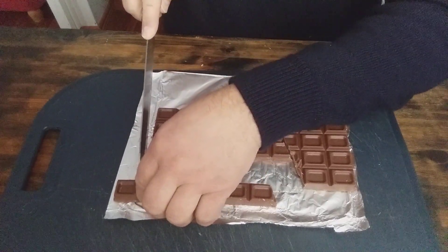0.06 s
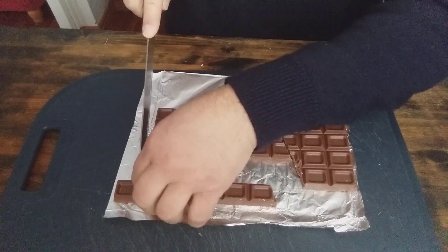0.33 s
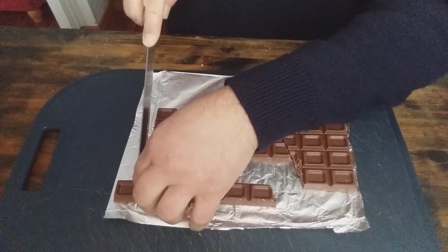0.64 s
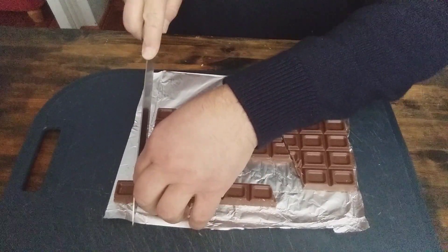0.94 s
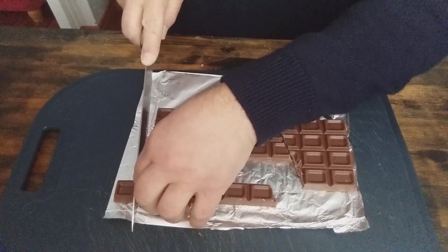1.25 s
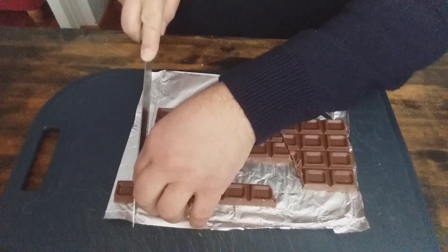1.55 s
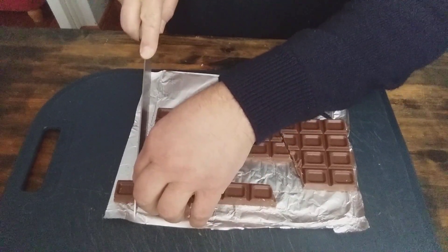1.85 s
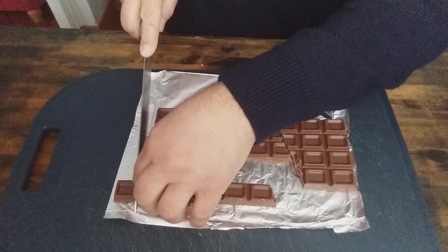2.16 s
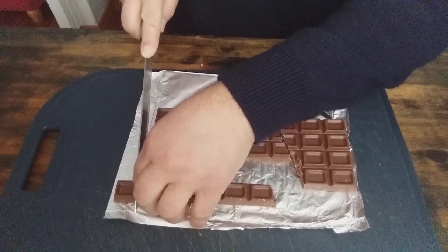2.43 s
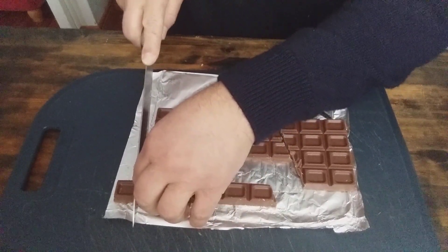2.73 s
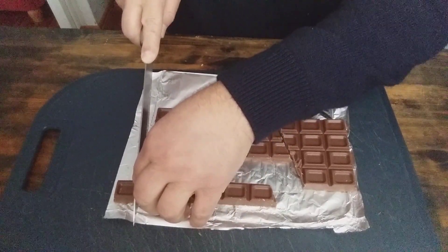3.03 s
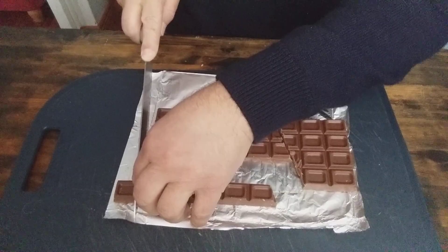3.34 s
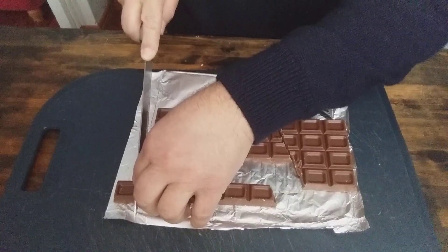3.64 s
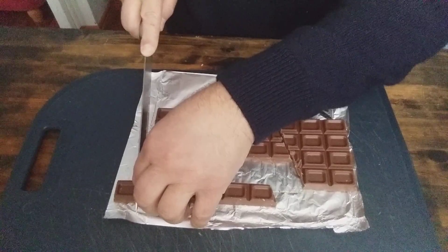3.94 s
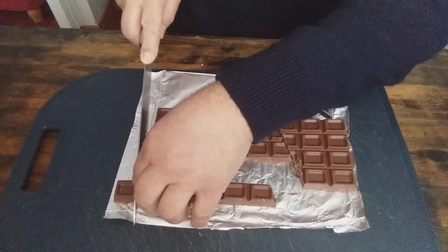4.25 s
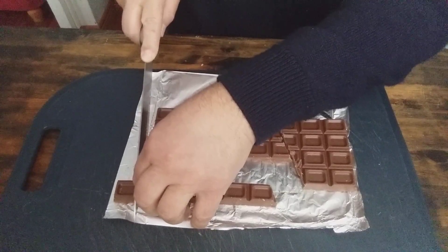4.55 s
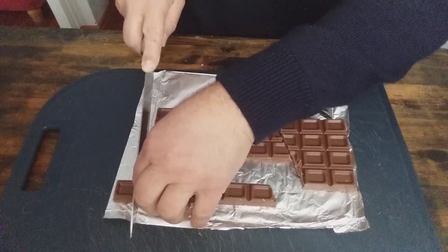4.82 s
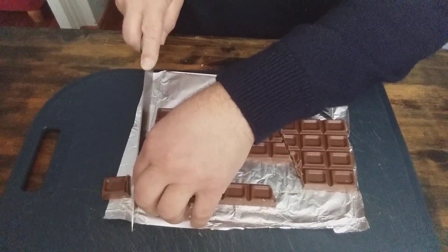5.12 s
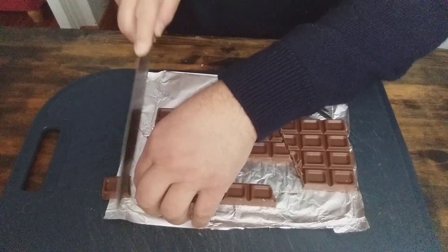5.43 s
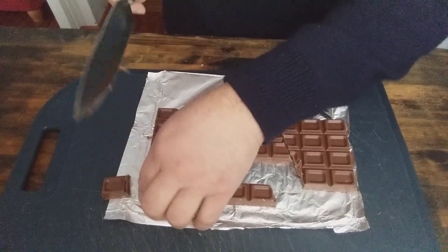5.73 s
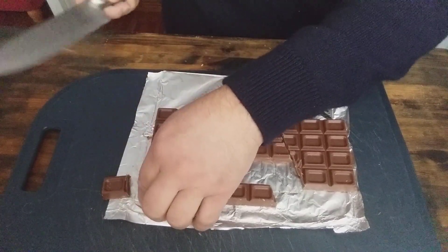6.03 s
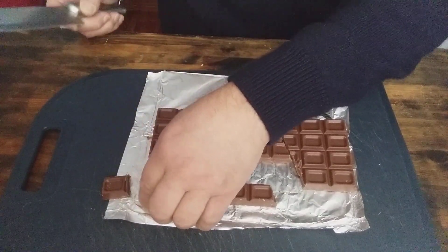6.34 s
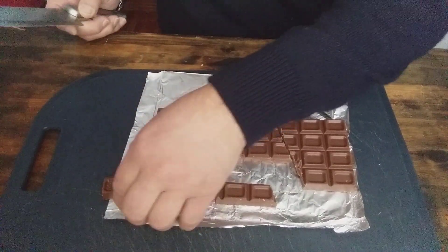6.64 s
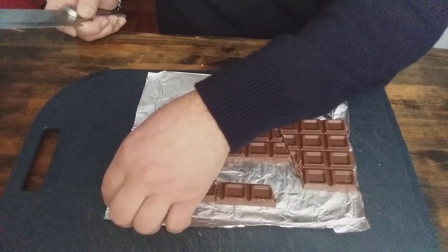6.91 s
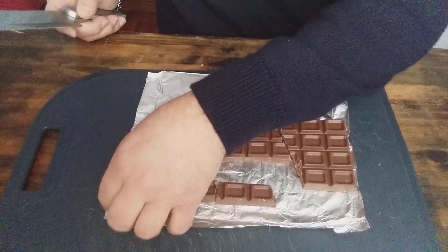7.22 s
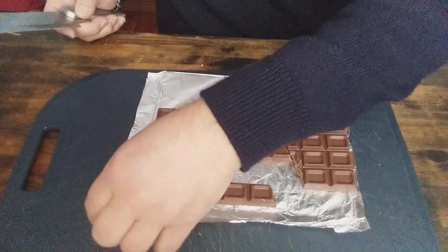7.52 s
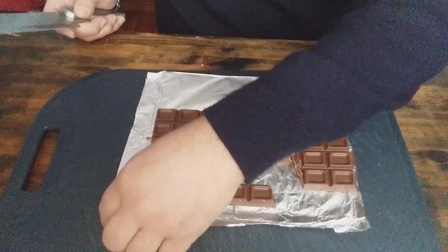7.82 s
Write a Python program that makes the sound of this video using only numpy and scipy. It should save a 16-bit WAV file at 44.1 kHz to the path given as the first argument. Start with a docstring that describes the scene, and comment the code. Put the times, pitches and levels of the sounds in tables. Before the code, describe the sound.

Thin foil crinkles with small bright ticks during the first second, close to the microphone in a small room with a faint low hum. A kitchen knife starts sawing quietly into a chocolate bar on a plastic cutting board. From about 1.5 to 4.5 seconds, uneven pushes come two or three times a second, each with a soft juddering thud, a gritty scrape and faint ringing of the steel. Between 2 and 4.2 seconds the chocolate also gives tiny creaks against the blade. At about 4.9 seconds the bar snaps and the blade slams onto the board, by far the loudest sound, with a short ring and a fine spray of splinters. A softer bump follows just after 5 seconds. From then on a hand makes scattered foil ticks and light sliding rustles, ending with a stronger brush near 7.8 seconds.

```python
"""A kitchen knife saws through a chocolate bar lying in its foil on a plastic board, close to one microphone.
Each push thuds the board, scrapes the blade into ringing and makes the chocolate creak against the steel;
then the bar snaps and the blade slams onto the board. The holding hand crinkles and brushes the foil.
The place is a small room with a short decay and a low hum."""
import sys
import numpy as np
from scipy import signal
from scipy.fft import rfft, irfft
from scipy.io import wavfile
from scipy.ndimage import uniform_filter1d

SR = 44100
rng = np.random.default_rng(int(sys.argv[2]) if len(sys.argv) > 2 else 0)


def wav_out(sig):
    """Save sig, one row per channel (or a flat mono array), as 16-bit PCM at SR to the path in sys.argv[1]."""
    wavfile.write(sys.argv[1], SR, np.round(np.clip(np.atleast_2d(sig).T, -1, 1) * 32767).astype(np.int16))


N = 347177
TIME = np.arange(N) / SR

# modes of the board on the table: pitch_hz, level_db, t60_s
BOARD_MODES = [(138, -8, .55), (185.5, -13.5, 0.63), (219.1, -12.5, 0.16), (253.5, -1, 0.17),
               (284, -3.5, .17), (442.3, -13, 0.23), (540, -9, .26), (764, 0, 0.27), (896.4, -10.5, 0.22),
               (954, -6.5, 0.23), (1080, -7, 0.14), (1153, -1.5, 0.31), (1245, -6.5, .25),
               (1380, -12.5, 0.17), (1430, -5.5, 0.37), (1610, -15, 0.19), (1687, -13.5, 0.35),
               (1987, -17.5, .23), (2042, -16, .23), (2176, -9, 0.29), (2390, -22, .23), (2593, -25, .14)]
# modes of the steel blade: pitch_hz, level_db, t60_s
BLADE_MODES = [(3207, -12, 0.37), (3486, -9, .26), (3538, -5.5, 0.23), (5226, -5, .22), (5490, -6, 0.17),
               (5470, -6.5, .2), (5643, -6, .18), (5800, -6, 0.22), (6130, -3.5, 0.23), (7400, -14, 0.24),
               (7922, -9, 0.13), (8586, -16.5, .19), (8600, -9, 0.055), (9400, -9, .09), (9600, -11, .1),
               (10840, -18, .12), (11340, -17, .1)]
# the foil's bright spectrum: frequency_hz, level_db
FOIL_SPECTRUM = [(700, -19.5), (2500, -12), (4500, -4.5), (7000, -1), (8300, -8), (10000, -0.5),
                 (13000, -2.5), (16000, -3)]
CREASE_DB, CREASE_HZ = -39.5, 6400  # a usual crease in the foil


def undb(db):
    """Decibels to gain."""
    return 10 ** (np.asarray(db) / 20)


def unit(x):
    """Scale to unit energy."""
    return x / np.sqrt(np.sum(x ** 2))


def noise(size=N):
    """White noise."""
    return rng.standard_normal(size)


def through(x, response):
    """Pass a sound through a response."""
    return signal.fftconvolve(x, response)[:N]


def lookup(points, hz):
    """Read (frequency_hz, value) points on a log-frequency axis."""
    frequencies, values = np.transpose(points)
    return np.interp(np.log(np.maximum(hz, 1)), np.log(frequencies), values)


def colour(points, size=4096):
    """Minimum-phase response of unit energy with the given spectrum."""
    magnitude = undb(lookup(points, np.fft.rfftfreq(size, 1 / SR)))
    cepstrum = irfft(np.log(magnitude))
    cepstrum[1:size // 2] *= 2
    cepstrum[size // 2 + 1:] = 0
    return unit(irfft(np.exp(rfft(cepstrum))))


def ring(modes):
    """Sum of fading modes, of unit energy; neighbours swing in opposite senses."""
    t = TIME[:SR]
    return unit(sum((-1) ** k * undb(db - 60 * t / t60) * np.sin(2 * np.pi * hz * t)
                    for k, (hz, db, t60) in enumerate(modes)))


def add(track, start_s, sound):
    """Lay a sound into a track."""
    i = max(int(start_s * SR), 0)
    part = sound[:max(N - i, 0)]
    track[i:i + len(part)] += part


def burst(rise_s, fade_s):
    """Envelope that swells and dies away, peak 1."""
    t = TIME[:SR // 4]
    shape = (1 - np.exp(-t / max(rise_s, 1 / SR))) * np.exp(-t / max(fade_s, 10 / SR))
    return shape / shape.max()


def swing(start_s, end_s):
    """Speed of a movement that starts and ends at rest, peak 1."""
    return np.abs(np.sin(np.linspace(0, np.pi, max(int((end_s - start_s) * SR), 2))))


def grit(spread_db, grain_samples=24):
    """Noise made of tiny grains of uneven size, rms 1."""
    sizes = np.repeat(undb(spread_db * noise(N // grain_samples + 1)), grain_samples)[:N]
    return unit(noise() * sizes) * np.sqrt(N)


def bending(response, lag_s, size=8192):
    """Bending waves in a plate: the treble arrives first, the bass later; lag_s is the delay at 1 kHz."""
    hz = np.maximum(np.fft.rfftfreq(size, 1 / SR), 1)
    dispersion = np.exp(-4j * np.pi * lag_s * np.sqrt(1000 * hz))
    return irfft(rfft(response, size) * dispersion, size)


def room(x, wet_db, build_s, bands=9):
    """Direct sound plus the small room's dense tail, which builds up and loses its treble first."""
    # room decay: frequency_hz, t60_s
    decay = [(100, 0.32), (300, 0.26), (1200, 0.28), (3000, .3), (7000, 0.23), (15000, 0.17)]
    t = TIME[:SR]
    centres = np.geomspace(60, 15000, bands)
    spectrum, hz = rfft(noise(SR)), np.fft.rfftfreq(SR, 1 / SR)
    tail = 0
    for centre, share in zip(centres, np.eye(bands)):
        band = irfft(spectrum * lookup(np.c_[centres, share], hz), SR)
        tail = tail + band * np.exp(-np.log(1000) * t / lookup(decay, centre))
    build_up = 1 - np.exp(-t / build_s)
    return x + undb(wet_db) * through(x, unit(tail * build_up))


def room_tone():
    """Faint air noise and a narrow, wavering low hum."""
    # the room's air: frequency_hz, level_db
    air_spectrum = [(28, -33), (50, -20), (78, -7.5), (110, -9), (135, -7), (165, -19.5), (210, -18),
                    (300, -22), (600, -29), (1000, -26.5), (2000, -33.5), (5000, -40), (8500, -44),
                    (16000, -45)]
    # course of the hum: time_s, level_db
    hum_levels = [(0, -59), (.7, -58), (1.4, -61), (5.2, -61), (5.7, -66.5), (7.87, -66)]
    times, levels = np.transpose(hum_levels)
    strength = undb(np.interp(TIME, times, levels, right=-np.inf))
    hum = strength * through(noise(), ring([(135.66, 0, 0.62)]))
    air = through(noise(), colour(air_spectrum))
    return undb(-63.5) * air + undb(2) * hum


def small_creases(count=32, gap_s=0.047, spread_db=2.5, spread_octaves=0.4):
    """Handled foil ticks faintly at uneven gaps: rows of start_s, level_db, pitch_hz."""
    # spells of handling: start_s, end_s, level_db
    handling = [(.08, .58, -47), (0.639, .76, -48), (5.28, 5.34, -52), (6.431, 6.56, -50),
                (7.3, 7.45, -45.5)]
    rows = []
    for start_s, end_s, db in handling:
        gap, size, pitch = rng.standard_normal((count, 3)).T
        times = start_s + np.cumsum(gap_s * np.exp(0.5 * gap)) - gap_s / 2
        pitches = CREASE_HZ * 2 ** (spread_octaves * (pitch - 1))
        ticks = np.c_[times, db + spread_db * size, pitches]
        rows += list(ticks[times < end_s])
    return rows


def foil():
    """Creases flip with bright ticks, each facet at its own pitch; the hand adds rustle and brushes."""
    # the loudest creases: start_s, level_db, pitch_hz
    crinkles = [(.0114, -33.5, 7000), (.038, -37, 4440), (.0632, -40, 6640), (.0741, -37, 3220),
                (.189, -41, 11100), (.2484, -34.5, 6600), (.255, -35.5, 9980), (.2974, -40, 4870),
                (.314, -41, 3500), (.3316, -22.5, 5500), (.3927, -33, 10400), (.4187, -36, 6060),
                (.4755, -40, 10600), (.532, -41.5, 9400), (.638, -31.5, 6960), (.6697, -26.5, 9200),
                (.7172, -35, 6420), (.9671, -38.5, 3800), (1.8856, -49, 3950), (4.4462, -33.5, 11000),
                (4.4802, -38, 7050), (5.1848, -34.5, 6030), (5.231, -39, 3350), (5.3954, -40.5, 5910),
                (5.5628, -40, 10070), (5.6214, -37.5, 7100), (6.2988, -45.5, 2840), (6.5812, -37.5, 8980),
                (6.5951, -38, 5670), (6.6937, -45, 4300), (6.8458, -37, 10700), (6.8837, -34, 10270),
                (7.1136, -31, 7370), (7.1207, -41.5, 7330), (7.3848, -35.5, 2830), (7.6109, -42.5, 8380),
                (7.6531, -43, 6380)]
    # the hand slides over the foil: start_s, end_s, level_db, body_db
    slides = [(6.02, 6.8, -71, -68), (6.749, 7.2, -65.5, -70.5), (7.248, 7.477, -60.5, -66),
              (7.5, 7.847, -83, -74)]
    # fingers brush and press it: start_s, level_db, body_db, rise_s, fade_s
    brushes = [(6.262, -69, -68.5, .008, 0.014), (6.69, -58, -60.5, 0.0041, 0.029),
               (7.281, -53, -75, 0.016, 0.016), (7.372, -52, -50, .02, 0.015),
               (7.403, -43, -60, 0.0049, 0.0074), (7.839, -38.5, -38, 0.025, 0.063)]
    # the foil's midrange body: frequency_hz, level_db
    body_spectrum = [(200, -5), (700, -6.5), (1400, 0), (2200, -4.5), (3000, -2), (5000, -14.5),
                     (9000, -44)]
    bright, body, facets, rustle, drag = np.zeros((5, N))
    for start_s, db, hz in [*crinkles, *small_creases()]:
        fade_s = 0.0024 * 2 ** ((db - CREASE_DB) / 35)  # louder creases sound longer
        tick = undb(db) * burst(0.00039, fade_s)
        octaves = np.log2(hz / CREASE_HZ)  # wide, low facets have more body and a clearer note
        body_db, note_db = -17.5 - 4 * octaves, -11.5 - 3.5 * octaves
        add(bright, start_s, tick)
        add(body, start_s, undb(body_db) * tick)
        # a buckling facet has no steady pitch
        pitch = hz * (1 + 0.68 * uniform_filter1d(noise(len(tick)), size=12))
        add(facets, start_s, undb(note_db) * tick * np.sin(2 * np.pi * np.cumsum(pitch) / SR))
    for start_s, end_s, db, body_db in slides:
        add(rustle, start_s, undb(db) * swing(start_s, end_s))
        add(drag, start_s, undb(body_db) * swing(start_s, end_s))
    for start_s, db, body_db, rise_s, fade_s in brushes:
        add(rustle, start_s, undb(db) * burst(rise_s, fade_s))
        add(drag, start_s, undb(body_db) * burst(rise_s, fade_s))
    treble = undb(-5) * bright * grit(1.4) + undb(-1.5) * rustle * grit(4.3)
    middle = undb(-1.5) * body * grit(5) + undb(-4) * drag * grit(4.4)
    return through(treble, colour(FOIL_SPECTRUM)) + through(middle, colour(body_spectrum)) + facets


def rubbing(usual_stroke_s=0.18):
    """The blade hisses with its speed, quiet at each turn; crumbs grind and the steel rings faintly."""
    # the sawing blade turns round: time_s
    turns = [.427, 1.3, 1.492, 1.715, 1.88, 2.072, 2.24, 2.408, 2.547, 2.782, 2.93, 3.148, 3.32, 3.485,
             3.642, 3.852, 4.015, 4.282, 4.48, 4.94]
    # a usual stroke, push then pull: hiss_db, grind_db
    stroke_levels = [(-66.5, -65.5), (-68, -65)]
    # steel rubbing on chocolate: frequency_hz, level_db
    hiss_spectrum = [(1000, -13.5), (2600, 0), (3600, 3), (4800, -2.5), (7100, 3.5), (8300, -11.5),
                     (10000, -8), (15500, -11.5)]
    # grinding crumbs: frequency_hz, level_db
    grind_spectrum = [(150, -5.5), (500, 6.5), (800, -5), (1100, 1.5), (1700, 1.5), (2600, -5),
                      (3800, -6.5), (6000, -18)]
    hiss, grind = np.zeros((2, N))
    for k, (start_s, end_s) in enumerate(zip(turns, turns[1:])):
        hiss_db, grind_db = stroke_levels[k % 2]
        speed = swing(start_s, end_s)
        slowness = np.log2((end_s - start_s) / usual_stroke_s)  # slow strokes are quieter
        add(hiss, start_s, undb(hiss_db - 2 * slowness) * speed ** 1.1)
        add(grind, start_s, undb(grind_db - slowness) * speed ** 0.5)
    friction = undb(1) * through(hiss * grit(2.4), colour(hiss_spectrum))
    crumbs = undb(2) * through(grind * grit(3.1), colour(grind_spectrum))
    return friction + crumbs + undb(-15.5) * through(crumbs, ring(BLADE_MODES))


def creaks():
    """Chocolate creaks on steel: a few uneven stick-slip cycles that sink in pitch as it lets go."""
    # creaks in the cut: start_s, level_db, pitch_hz
    events = [(1.966, -49.5, 1050), (2.006, -54, 1020), (2.062, -48, 685), (2.492, -45.5, 766),
              (2.654, -46, 773), (2.777, -46, 770), (3.356, -50.5, 1380), (3.403, -44, 786),
              (3.531, -48.5, 606), (3.605, -49, 936), (3.73, -42, 604), (3.889, -43.5, 616),
              (4.11, -45.5, 875), (4.155, -52, 1060)]
    track, t = np.zeros(N), TIME[:SR // 4]
    for start_s, db, hz in events:
        wobble = uniform_filter1d(noise(len(t)), size=25)
        pitch = hz * (0.915 + 0.25 * np.exp(-t / 0.0055) + 2 * wobble)
        tone = np.sin(2 * np.pi * np.cumsum(pitch) / SR)
        add(track, start_s, undb(db) * burst(0.00044, 0.0052) * tone)
    return track


def judders(count=3, extra_steel_loss_db=6.5):
    """Each push catches a few times, ever more weakly: rows of start_s, thud_db, steel_db, crumb_db."""
    # pushes on the knife: start_s, thud_db, steel_db, crumb_db, judder_gap_s, loss_per_judder_db
    pushes = [(1.535, -32.5, -27, -35.5, 0.064, 13.5), (1.903, -38, -49, -46, .058, 10.5),
              (2.27, -33.5, -38, -41, 0.045, 8.5), (2.593, -34, -35.5, -39, 0.051, 7),
              (2.988, -42, -62, -59, 0.074, 20), (3.361, -37.5, -59, -54, 0.039, 12),
              (3.672, -29.5, -33, -35, .042, 5), (4.049, -37, -51.5, -46.5, 0.051, 5),
              (4.424, -46, -70, -64, .05, 20), (4.499, -33, -38, -34, .05, 27),
              (5.142, -33, -34.5, -35.5, .02, 8)]
    return [(start_s + k * gap_s, thud_db - k * loss_db,
             steel_db - k * (loss_db + extra_steel_loss_db), crumb_db - k * loss_db)
            for start_s, thud_db, steel_db, crumb_db, gap_s, loss_db in pushes for k in range(count)]


def flexing():
    """Every change of load flexes the blade, which sings on faintly, a little louder after hard pushes."""
    # the blade's long-ringing bending modes: pitch_hz, level_db, t60_s
    flex_modes = [(1523, -3, .6), (3311, 0, 1.15)]
    jolts = np.zeros(N)
    for start_s, thud_db, _, _ in judders():
        jolt = unit(burst(0.003, 0.03) * noise(SR // 4))
        add(jolts, start_s, undb(0.5 * thud_db) * jolt)
    return undb(-16) * through(jolts, ring(flex_modes))


def slips(lag_s=0.0041, hard_slip_db=-35):
    """Just after the board takes the load the blade sticks and slips, rasping and grinding crumbs."""
    # modes near the blade's edge, damped by the chocolate: pitch_hz, level_db, t60_s
    edge_modes = [(1890, -10, .014), (3620, -1.5, 0.0094), (5310, 0, 0.0079), (6050, -0.5, 0.0083),
                  (7690, -3.5, 0.0098), (9100, -6, 0.0097), (9730, -4, 0.0072), (11420, -8.5, 0.0084),
                  (13900, -7, 0.006), (15600, -17, 0.0065)]
    # crumbs under the edge: frequency_hz, level_db
    crumb_spectrum = [(120, -10.5), (300, -3), (800, 0), (1900, -3), (2700, -13.5), (5000, -24.5)]
    steel, crumbs = np.zeros((2, N))
    for start_s, _, steel_db, crumb_db in judders():
        gentleness = np.clip((hard_slip_db - steel_db) / 22, 0, 1)
        fade_s = 0.014 * 2 ** gentleness  # gentle slips last up to twice as long
        add(steel, start_s + lag_s, undb(steel_db) * burst(0.0033, fade_s))
        add(crumbs, start_s + lag_s, undb(crumb_db) * burst(0.0017, 1.4 * fade_s))
    rasp = steel * grit(3)
    blade = undb(-13) * through(rasp, ring(BLADE_MODES)) + undb(-9.5) * through(rasp, ring(edge_modes))
    return blade + undb(-8) * through(crumbs * grit(4.3), colour(crumb_spectrum))


def thuds():
    """Soft pushes move mainly the board's lowest modes, and the bar grates on it for a moment."""
    # a soft push, and the bar grating on the board: frequency_hz, level_db
    thud_spectrum = [(25, -24), (55, -6.5), (130, 3.5), (200, -7), (320, -16.5), (500, -25.5),
                     (1000, -49.5), (3000, -79.5)]
    grate_spectrum = [(70, -19), (140, -4.5), (280, 2), (520, -6), (900, -14), (2000, -30), (5000, -59)]
    pushes, drag = np.zeros((2, N))
    for start_s, thud_db, _, _ in judders():
        add(pushes, start_s, undb([thud_db]))
        add(drag, start_s, undb(thud_db) * burst(0.005, 0.03))
    thud = through(pushes, bending(colour(thud_spectrum), lag_s=0.001))
    grating = undb(-16.5) * through(drag * grit(2.97), colour(grate_spectrum))
    board = undb(-0.5) * through(thud, ring(BOARD_MODES))
    return room(undb(24) * thud + grating, wet_db=-3.5, build_s=0.0085) + board


def snap(crack_s=4.9075, blow_s=4.9277):
    """The bar cracks and gives way: the blade strikes the board, both ring, and splinters skid off."""
    # the hard blow, and the small dull crack before it: frequency_hz, level_db
    blow_spectrum = [(40, -31), (100, -16), (270, 4.5), (420, -5.5), (600, -7.5), (1200, -2), (1600, -8),
                     (2200, -13.5), (2900, -28), (3800, -24.5), (5500, -35.5), (8300, -38.5), (14500, -37),
                     (16500, -47)]
    crack_spectrum = [(60, -15.5), (250, 1), (500, -7.5), (1500, -33), (4000, -55)]
    # quick, weaker echoes of the blow: start_s, level_db
    echoes = [(4.9299, -7), (4.9426, -13.5), (4.9529, -11), (4.9601, -12.5), (4.972, -13.5)]
    fracture, blow, echo_pulses = np.zeros((3, N))
    add(fracture, crack_s, np.ones(1))
    add(blow, blow_s, np.ones(1))
    for start_s, db in echoes:
        add(echo_pulses, start_s, undb([db]))
    crack = undb(-16.5) * through(fracture, colour(crack_spectrum))
    spray = undb(-51.5) * through(fracture, burst(0.0005, 0.0025))
    spray += undb(-50.5) * through(blow, burst(0.004, 0.094))
    grains = spray * grit(4.4)
    splinters = undb(-2.5) * through(grains, colour(FOIL_SPECTRUM))
    splinters += undb(-3) * through(grains, ring(BLADE_MODES))
    slam = undb(15) * through(blow + echo_pulses, bending(colour(blow_spectrum), lag_s=0.001622))
    board = undb(14.5) * through(blow, ring(BOARD_MODES))
    blade = undb(-17.5) * through(blow, ring(BLADE_MODES))
    # freed from the cut, the whole blade can also swing in its low mode
    blade += undb(-18.5) * through(blow, ring([(950, 0, 1.7)]))
    return room(slam + crack + splinters, wet_db=-3.5, build_s=0.007) + board + blade


def scene():
    """Knife, board and foil close up in the small room, in mono."""
    cutting = room(slips() + creaks() + rubbing(), wet_db=-7.5, build_s=0.0017)
    wrapper = room(foil(), wet_db=-6.5, build_s=0.0023)
    return (snap() + thuds() + flexing() + cutting + wrapper + room_tone())[None]


def record(dry):
    """The microphone thins the deep bass, clips at full scale and cuts the highest treble."""
    low_cut = signal.butter(3, 48, "high", fs=SR, output="sos")
    high_cut = signal.ellip(10, 0.2, 80, 16100, fs=SR, output="sos")
    clipped = np.clip(signal.sosfilt(low_cut, dry), -1, 1)
    return signal.sosfilt(high_cut, clipped)


dry = scene()
out = record(dry)
wav_out(out)
```